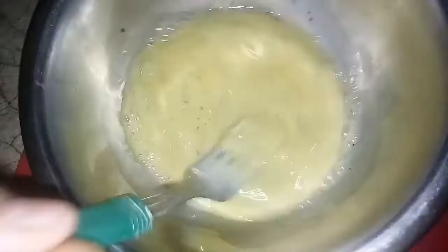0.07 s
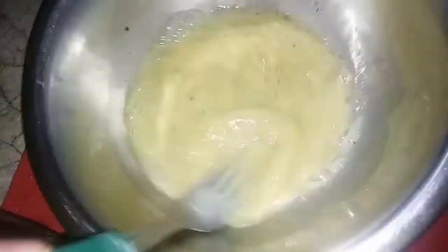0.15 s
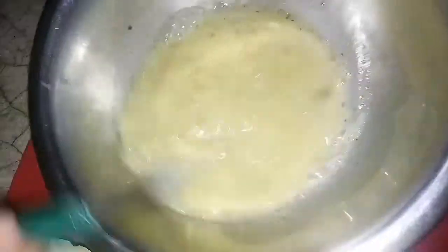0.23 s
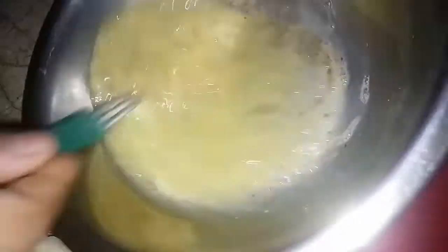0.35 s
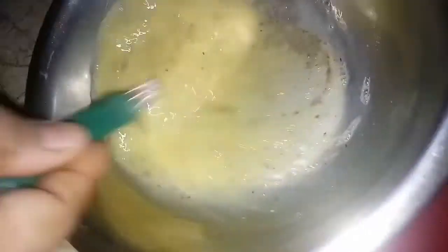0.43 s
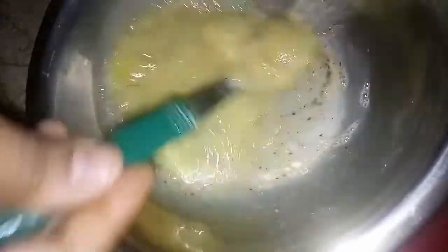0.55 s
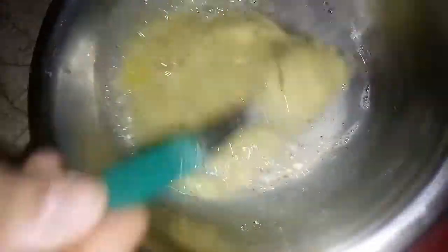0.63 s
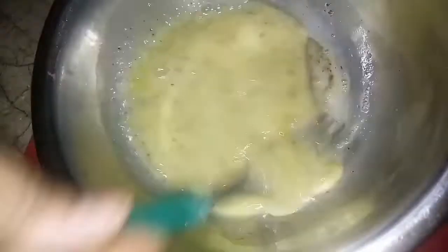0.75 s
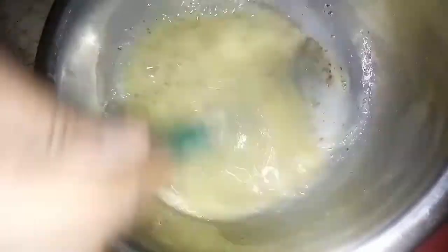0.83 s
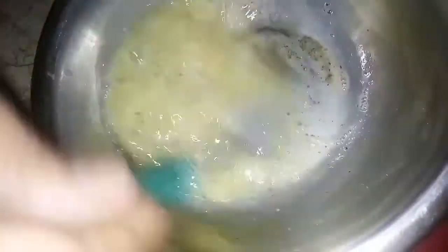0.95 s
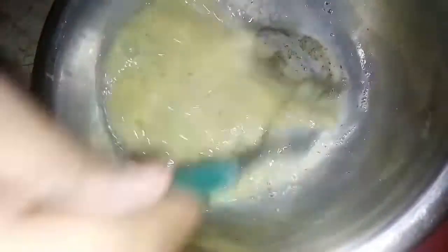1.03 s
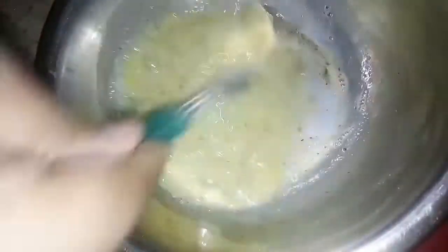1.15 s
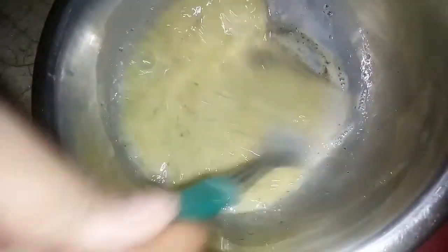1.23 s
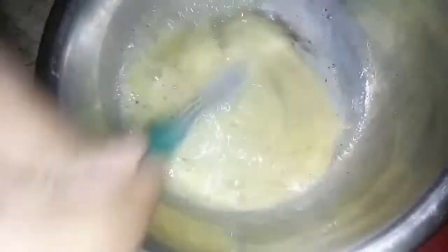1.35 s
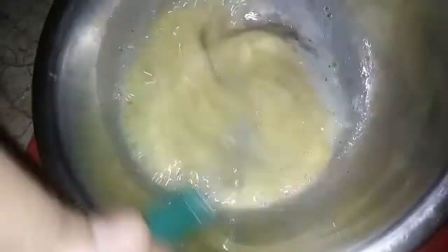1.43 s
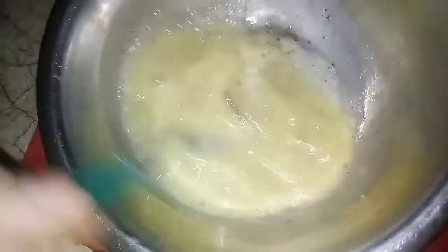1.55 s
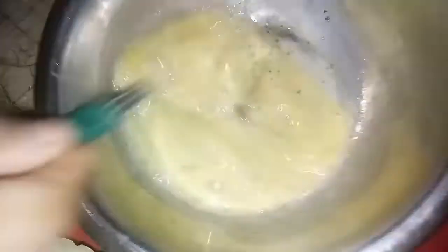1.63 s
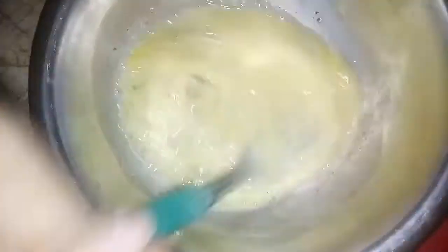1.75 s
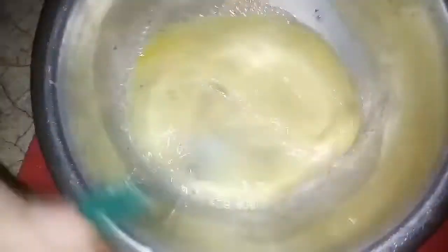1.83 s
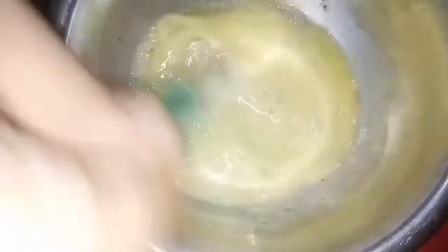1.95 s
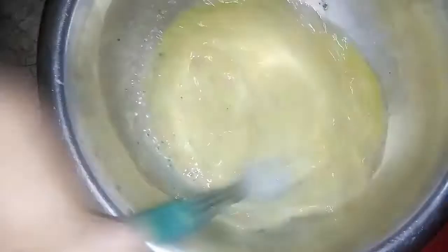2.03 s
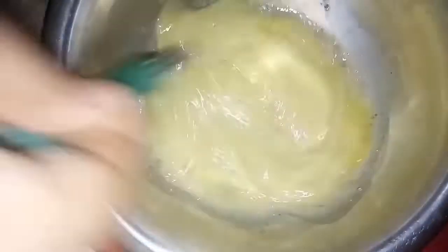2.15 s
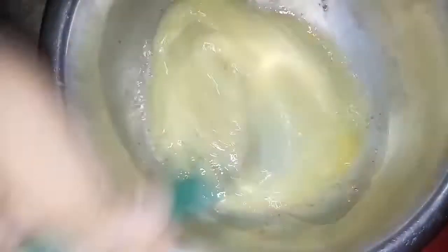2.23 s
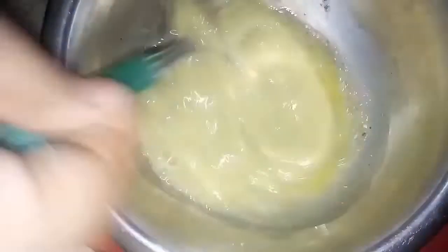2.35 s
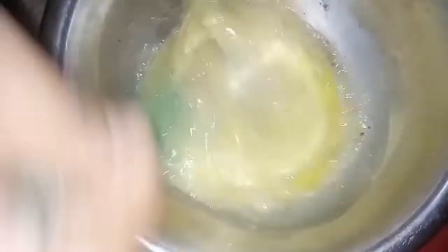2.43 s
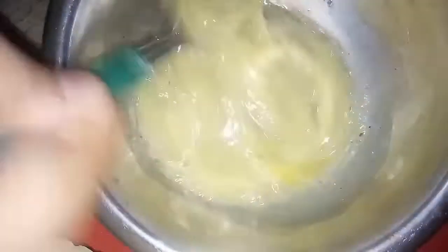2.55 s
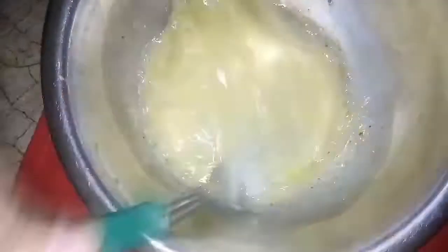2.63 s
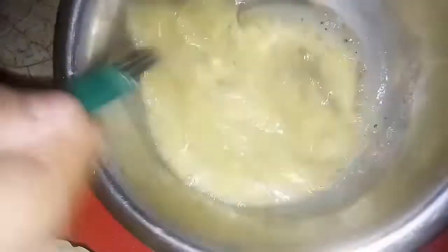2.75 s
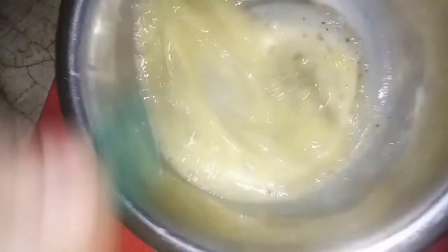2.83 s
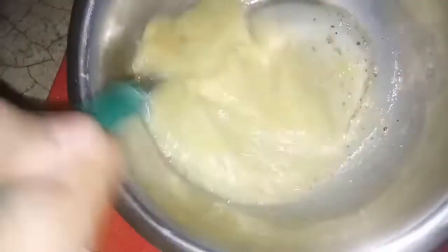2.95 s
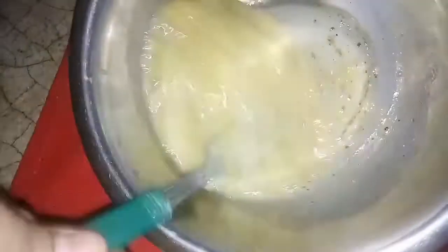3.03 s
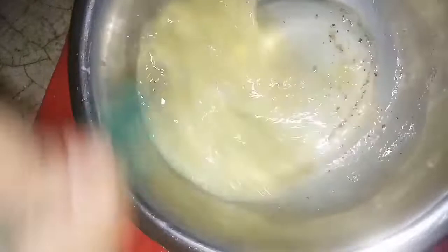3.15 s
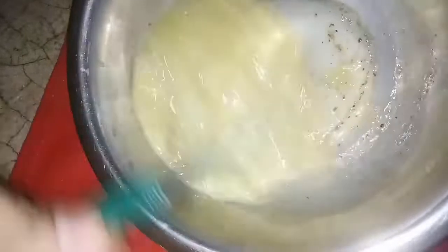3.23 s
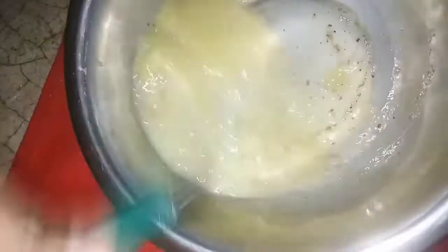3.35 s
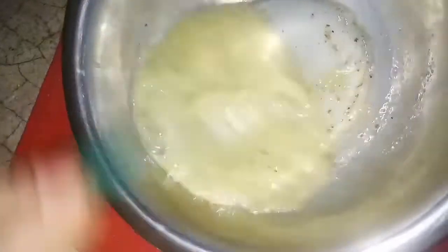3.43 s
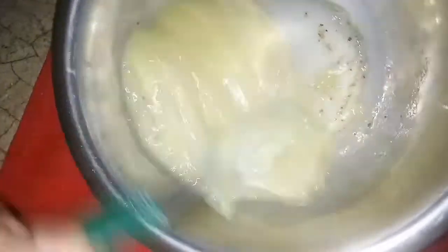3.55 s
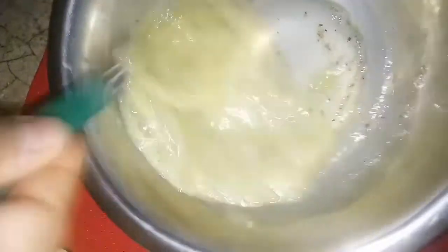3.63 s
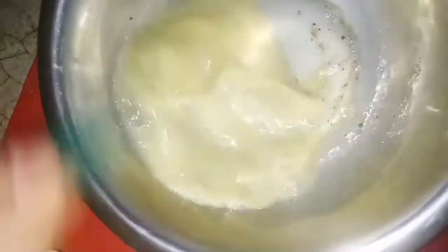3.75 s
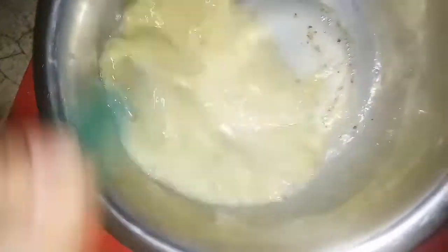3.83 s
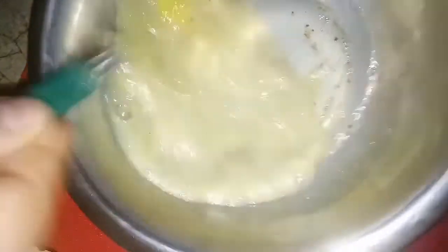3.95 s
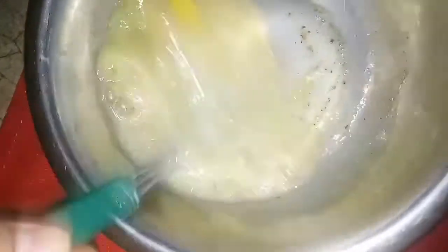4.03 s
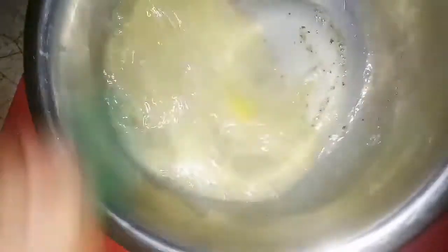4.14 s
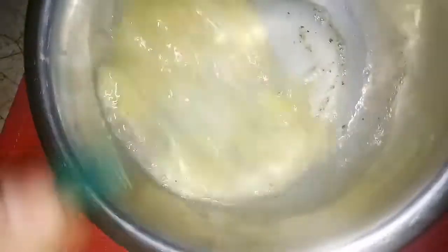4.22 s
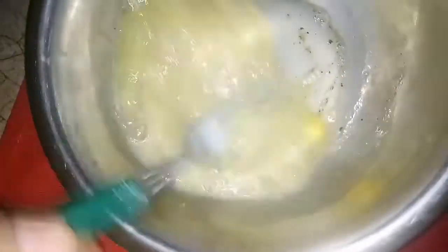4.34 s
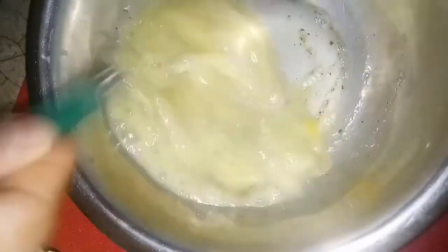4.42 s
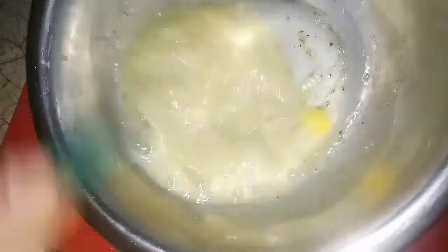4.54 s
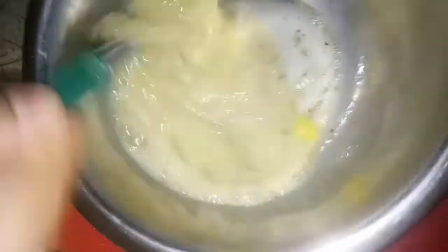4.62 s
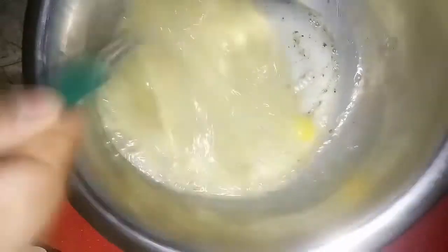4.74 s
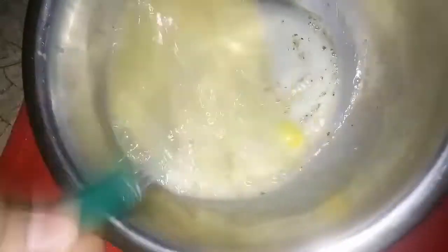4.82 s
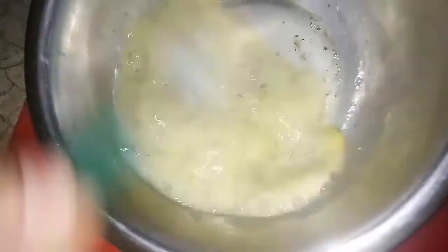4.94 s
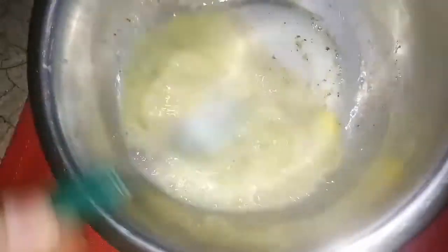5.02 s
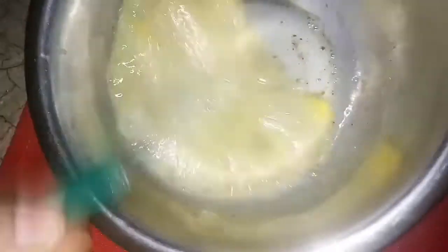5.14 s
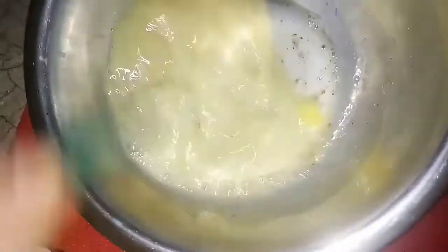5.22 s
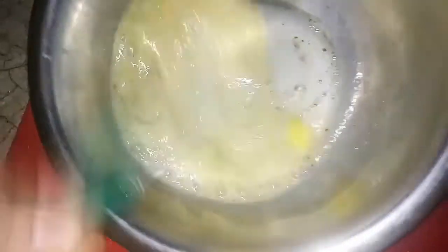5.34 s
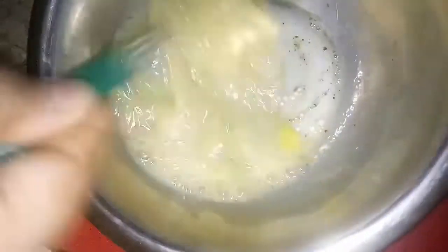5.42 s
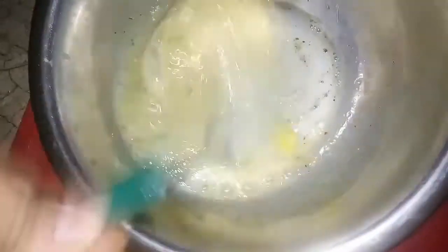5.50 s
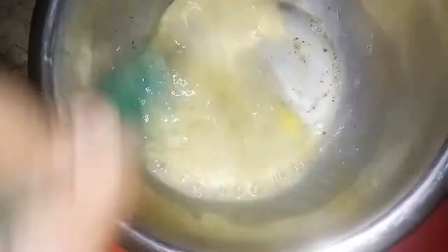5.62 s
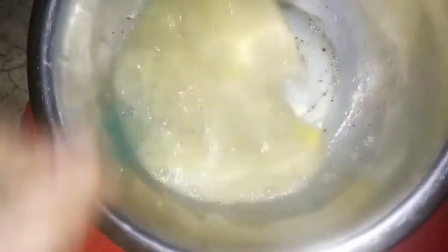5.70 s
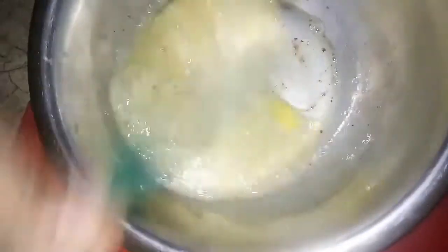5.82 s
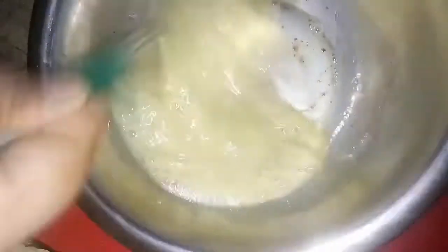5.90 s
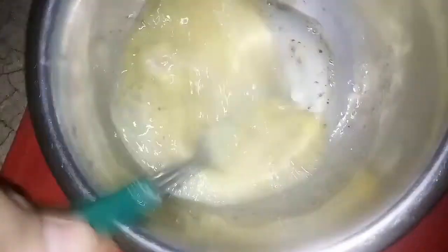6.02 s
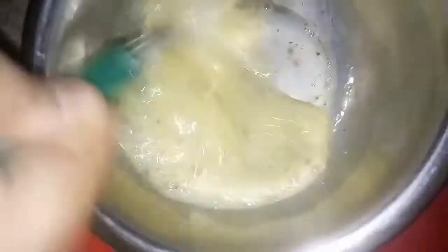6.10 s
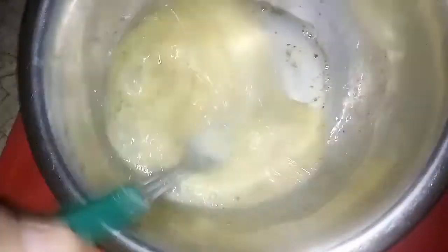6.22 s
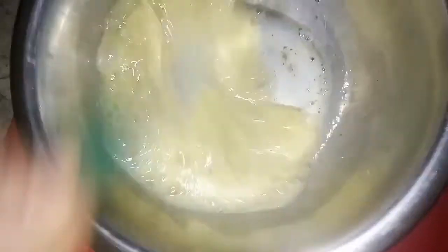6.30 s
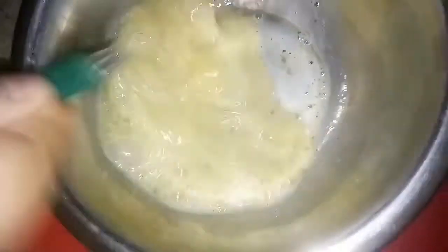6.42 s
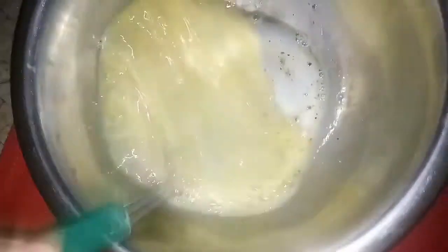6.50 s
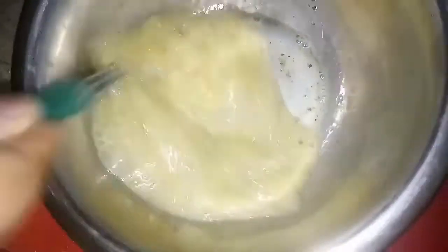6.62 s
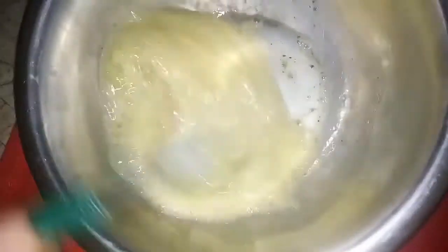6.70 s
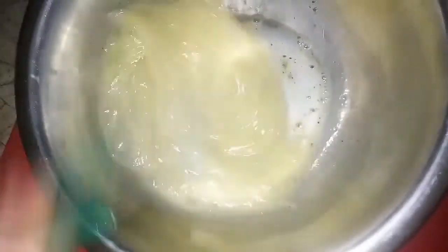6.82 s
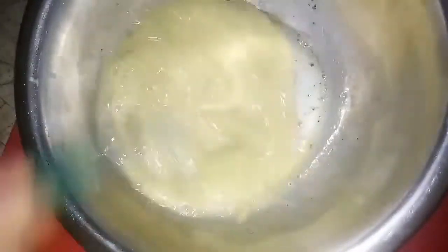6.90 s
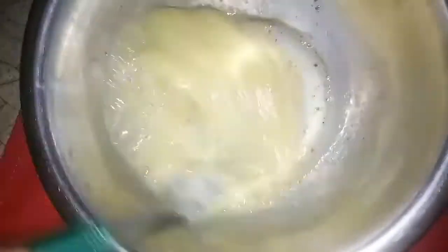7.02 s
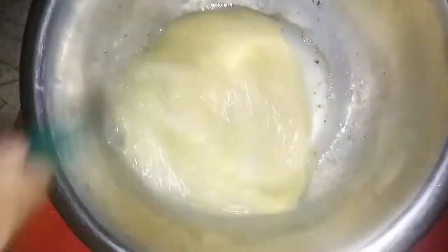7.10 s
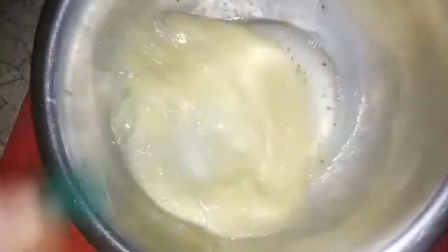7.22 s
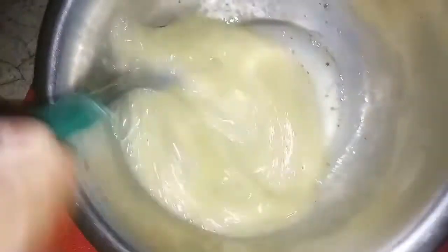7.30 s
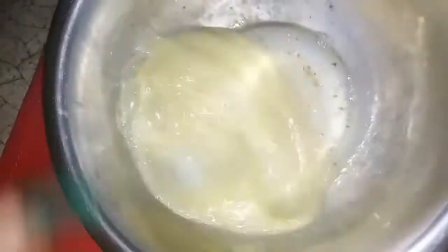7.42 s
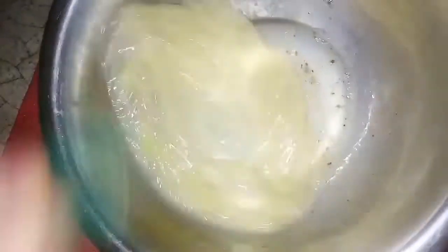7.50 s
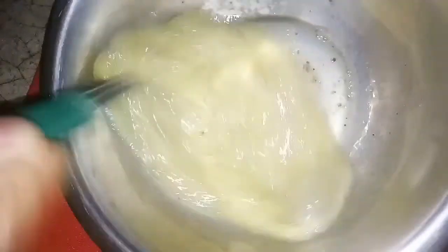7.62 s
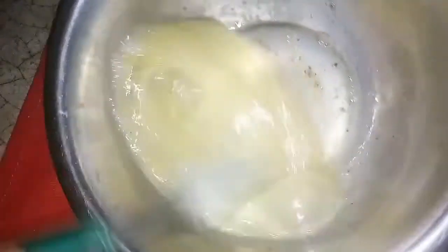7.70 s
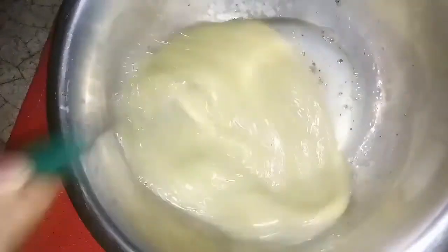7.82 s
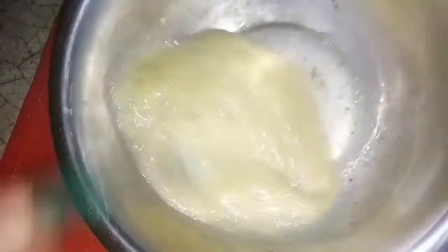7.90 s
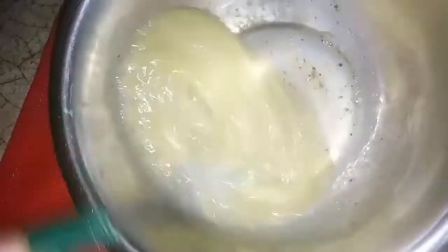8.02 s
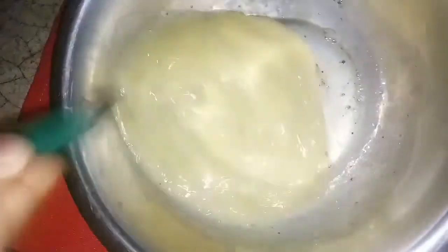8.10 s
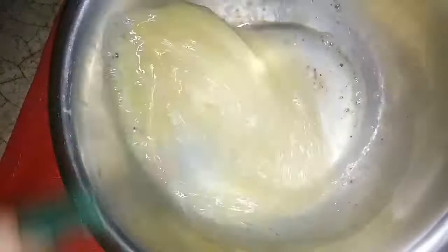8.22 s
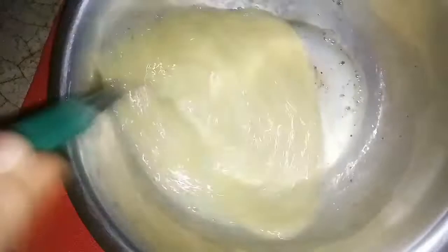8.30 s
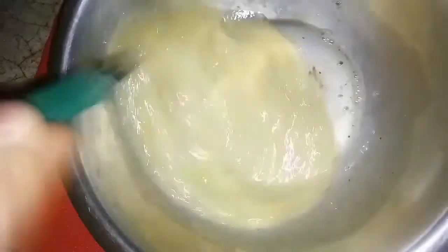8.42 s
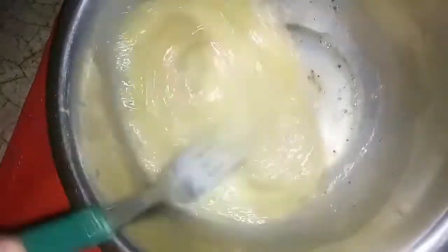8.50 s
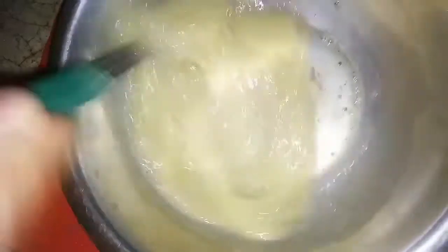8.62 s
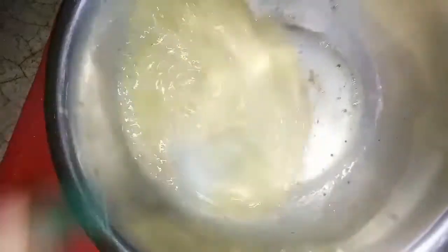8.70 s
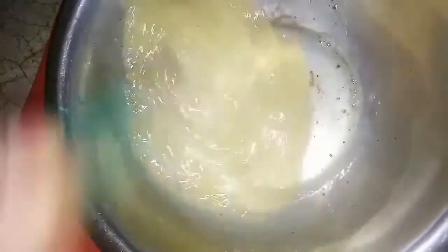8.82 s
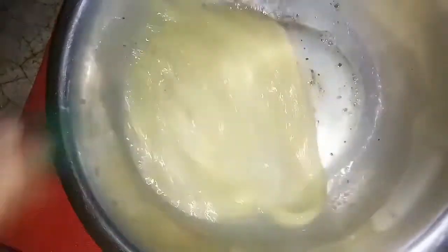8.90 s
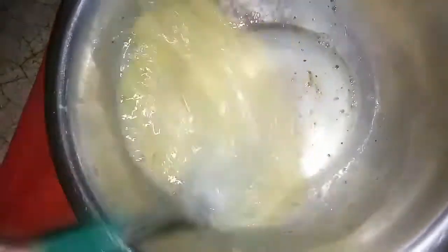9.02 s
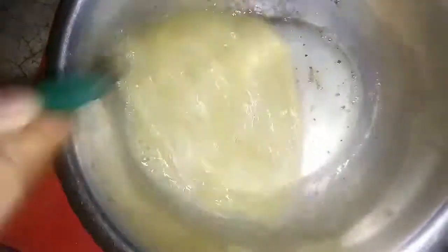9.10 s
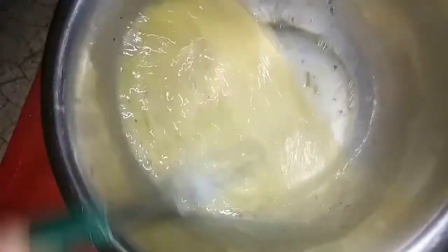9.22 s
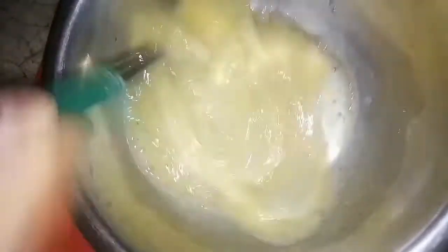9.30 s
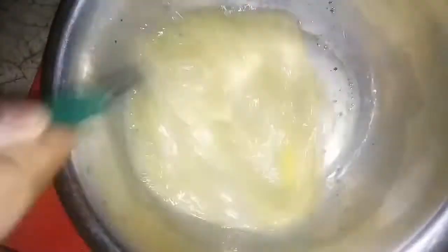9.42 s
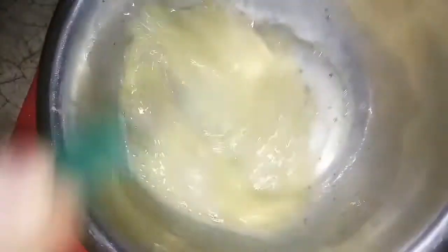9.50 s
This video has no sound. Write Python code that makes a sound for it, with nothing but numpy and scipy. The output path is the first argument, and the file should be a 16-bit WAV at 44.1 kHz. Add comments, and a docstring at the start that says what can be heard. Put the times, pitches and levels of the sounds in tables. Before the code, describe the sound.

A fork briskly beats egg in a steel bowl, sharp metallic clacks and scrapes with wet gurgling, uneven at first, then fast and steady.

```python
"""In a quiet kitchen, close to a phone, a fork beats eggs in a steel bowl, unevenly at first, then briskly.
Each blow excites the damped modes of the wet bottom; the tines then slide by stick-slip until they lift.
Bubbles ring in the egg and bright swishes pass as the tines skim the bowl before turning.
The dry rim sings on in thin, long modes whenever the hand and the egg damp it less."""
import sys
import numpy as np
from scipy import signal
from scipy.fft import rfft, irfft, next_fast_len
from scipy.io import wavfile
from scipy.ndimage import uniform_filter1d

SR = 44100
rng = np.random.default_rng(int(sys.argv[2]) if len(sys.argv) > 2 else 0)


def materialize(psi):
    """Save the field psi as 16-bit PCM at rate SR to the path in sys.argv[1].

    A 1-D psi becomes a single channel; in a 2-D psi each row is a channel.
    """
    bounded = np.clip(np.atleast_2d(psi).T, -1, 1)
    quanta = np.round(bounded * 32767).astype(np.int16)
    wavfile.write(sys.argv[1], SR, quanta)


N = 421287  # samples


def undb(db):
    """Decibels: the amplitude gain of a level."""
    return 10 ** (np.asarray(db, float) / 20)


def level(x, db):
    """Root mean square: scales a sound to an rms level in dB."""
    return x * undb(db) / np.sqrt(np.mean(x ** 2))


def lowpass(x, order, hz):
    """Butterworth filtering: keeps what lies below a frequency."""
    return signal.sosfilt(signal.butter(order, hz, fs=SR, output="sos"), x)


def highpass(x, order, hz):
    """Butterworth filtering: keeps what lies above a frequency."""
    return signal.sosfilt(signal.butter(order, hz, "high", fs=SR, output="sos"), x)


def colour(x, spectrum):
    """Spectral shaping: filters by (Hz, dB) points joined on a logarithmic frequency axis."""
    size = next_fast_len(len(x))
    hz, db = np.transpose(spectrum)
    log_bins = np.log(np.arange(size // 2 + 1) * SR / size + 1)
    gain = undb(np.interp(log_bins, np.log(hz), db))
    return irfft(rfft(x, size) * gain, size)[:len(x)]


def mode(x, hz, t60):
    """Modal resonance: one damped oscillator; a unit click makes it ring with size 1."""
    pole = np.exp(2j * np.pi * hz / SR - np.log(1000) / (t60 * SR))
    return signal.lfilter([1], [1, -pole], x).imag


def walk(rate):
    """Random modulation: slews between random levels 1 / rate s apart, with a spread near 1."""
    hold = int(SR / rate)
    held = np.repeat(rng.standard_normal(N // hold + 1), hold)
    return 1.5 * uniform_filter1d(held, hold)[:N]


EVENNESS = .7  # 0-1, how evenly the hand presses


def steady(x, span_s):
    """Level compression: swells longer than the span are evened out; rms 1."""
    power = uniform_filter1d(x ** 2, int(span_s * SR))
    return level(x / np.maximum(power, 1e-9 * power.max()) ** (EVENNESS / 2), 0)


# room noise: pitch_hz [Hz], level_db [dB per Hz]
KITCHEN_SPECTRUM = [(20, -37), (60, 0.5), (112, 1.5), (129, 7.5), (148, -0.5), (260, 3.5), (370, -6.5),
                    (800, -7), (3100, -10.5), (3500, -18), (7000, -26), (12000, -39), (15600, -43),
                    (16000, -70)]
# fading of the rumble: time_s [s], level_db [dB]
RUMBLE_FADE = [(0, 1.5), (3.4, -2), (4.5, -2), (9.55, -3.5)]
# low thrum while the rim sings loudest: middle_s [s], level_db [peak dB]
THRUMS = [(7.63, -53), (8.1, -53.5)]
THRUM_HZ, THRUM_S = 73, 0.076  # pitch; time from the middle of the swell to 1/e
KITCHEN_DB = -54.5  # rms of hiss and rumble


def kitchen():
    """Broadband room noise: a low rumble that wavers under a faint even hiss, with a low thrum."""
    t = np.arange(N) / SR
    swell = sum(undb(db) * np.exp(-((t - s) / THRUM_S) ** 2) for s, db in THRUMS)
    thrum = swell * np.sin(2 * np.pi * THRUM_HZ * t)
    room = colour(rng.standard_normal(N), KITCHEN_SPECTRUM)
    rumble = signal.sosfiltfilt(signal.butter(2, 300, fs=SR, output="sos"), room)
    rumble_db = np.interp(t, *np.transpose(RUMBLE_FADE)) + 1.5 * walk(19)
    return level(room + (undb(rumble_db) - 1) * rumble, KITCHEN_DB) + thrum


def floor_shake(bowl):
    """Structure-borne sound: the bowl's loudness, averaged mostly over the moment before, shakes the floor."""
    noise = colour(rng.standard_normal(N), [(20, -20.5), (150, -15.5), (400, -18.5), (1000, -27)])
    return level(uniform_filter1d(np.abs(bowl), 250, origin=100) * noise, -54.5)


def bubble(hz, decay_s, glide):
    """Bubble resonance: a pocket of air rings briefly, rising as it closes."""
    t = np.arange(2048) / SR
    cycles = hz * t * (1 + glide * np.tanh(t / decay_s / 3))
    return (1 - np.exp(-hz * t)) * np.exp(-t / decay_s) * np.sin(2 * np.pi * cycles)


# colour of the bowl as the egg froths: time_s [s], slide_treble_db [dB], bass_db [dB]
BOWL_STATE = [(0, 9.5, 4), (1.2, 10.5, -1), (2, 11, -41), (3, 4, 10), (4, -1, 8.5), (5, 3, 6), (6, 4, 5),
              (7, 1.5, 8), (8, 4.5, 9.5), (9.55, 1.5, 6)]
BASS_HZ, TREBLE_HZ = 1300, 4000  # bass lies below, treble above


def froth(s):
    """Changing load: treble of the slide and bass of the bowl (dB) as the egg froths."""
    state_s, *columns = np.transpose(BOWL_STATE)
    return [np.interp(s, state_s, column) for column in columns]


GURGLE_SPREAD_DB = 2.8


def gurgle(touch, count=700, low_hz=503.0, high_hz=3290.0, gurgle_db=0.5, cycles=4.1, glide=0.11):
    """Bubble population: small bubbles of every size burst while the tines drag through the egg."""
    out = np.zeros(N + 2048)
    for place, pitch, size in rng.random((count, 3)):
        i = int(place * N)
        hz = low_hz * (high_hz / low_hz) ** pitch
        db = gurgle_db - GURGLE_SPREAD_DB * np.log(size + 0.068)
        db += (hz < BASS_HZ) * (froth(i / SR)[1] - 15.0)
        out[i:i + 2048] += touch[i] * undb(db) * bubble(hz, cycles / hz, glide)
    return out[:N]


# air pockets plopping in the egg: start_s [s], level_db [dB], pitch_hz [Hz, before the rise]
PLOPS = [(0.386, -30, 1130), (2.597, -25.5, 1260), (3.043, -16, 1045), (3.253, -19.5, 1116),
         (3.316, -25, 765), (3.404, -15.5, 1040), (3.601, -12, 1220), (3.772, -13.5, 1183),
         (3.917, -19.5, 1115), (3.971, -26, 1200), (4.24, -23, 1130), (5.699, -25, 1150),
         (7.244, -26, 1130), (7.939, -14, 1076), (8.217, -34, 1150), (8.415, -16.5, 1210),
         (9.386, -23, 1120), (5.153, -17, 1110), (5.656, -11, 740), (5.98, -22.5, 1016), (6.683, -20, 1074),
         (7.545, -9.5, 1225), (7.877, -13, 1220), (8.029, -24, 1190), (8.526, -15.5, 1340),
         (8.569, -17, 1234), (9.364, -10, 1155), (8.116, -18, 1780)]


def plops(decay_s=0.0055, glide=0.089):
    """Bubble resonance: the larger pockets of air ring one by one."""
    out = np.zeros(N + 2048)
    for s, db, hz in PLOPS:
        i = int(s * SR)
        out[i:i + 2048] += undb(db) * bubble(hz, decay_s, glide)
    return out[:N]


# singing of the rim: start_s [s], end_s [s], level_db [dB], loudest_hz [Hz, halfway]
SINGING = [(1.766, 1.92, -63, 3450), (4.533, 4.678, -47, 3150), (5.266, 5.49, -47, 3250),
           (7.06, 7.209, -40.5, 3450), (7.247, 7.34, -44, 2980), (7.463, 7.526, -46.5, 3560),
           (7.543, 7.623, -40, 3700), (7.593, 7.71, -29, 3440), (7.72, 7.854, -40, 3160),
           (7.863, 8.023, -47, 3860), (8.033, 8.13, -36, 4240), (8.125, 8.187, -36, 3650),
           (8.035, 8.145, -38.5, 6000), (8.108, 8.2, -51, 5340), (8.374, 8.464, -46, 2880),
           (8.673, 8.805, -43.5, 3450), (8.85, 8.986, -47.5, 3100), (9.04, 9.185, -52, 3870),
           (9.446, 9.56, -44, 3570)]
# modes of the dry rim: pitch_hz [Hz], level_db [dB]
RIM_MODES = [(2519, -11), (2762, 7.5), (3047, 2.5), (3354, 6.5), (3660, -7.5), (3967, 6), (4274, 5),
             (4600, -26), (4990, -4), (5346, 1), (5722, -7), (6142, 1), (6570, -7), (7241, -2.5)]
RIM_T60_S, RIM_FLICKER_DB, RIM_MIX_DB = .2, 2.0, 2.0  # flicker in time; scatter from one singing to the next
SPREAD, REACH = 0.14, 0.22  # width of the favoured modes (log frequency); least share of the others
SING_RISE = .1  # the loudest modes climb by this share as the rubbed spot moves


def favoured(hz, loudest_hz):
    """Resonant selection: the share of a mode by its distance from the loudest one."""
    return 1 / (1 + (np.log(hz / loudest_hz) / SPREAD) ** 2)


def rim(touch, rub, always_db=-20.0):
    """Friction-driven modes: rubbing sustains the rim, faintly at every slide and clearly when it is free."""
    t, out = np.arange(N) / SR, 0
    for hz, db in RIM_MODES:
        gain = undb(always_db) * touch * favoured(hz, 3400)
        for start, end, sing_db, loudest_hz in SINGING:
            i = slice(int(start * SR), int(end * SR))
            part = (t[i] - start) / (end - start)
            near = favoured(hz, loudest_hz * (1 + SING_RISE * (part - .5)))
            swell = np.abs(np.sin(np.pi * np.abs(part) ** 0.83)) ** 0.8
            mixed_db = sing_db + RIM_MIX_DB * rng.standard_normal()
            gain[i] += undb(mixed_db) * swell * np.maximum(near, REACH)
        # every mode of the round rim is a close pair
        tone = level(steady(mode(rub, hz, RIM_T60_S), 0.023), -3)
        tone = tone + level(mode(rub, hz * 1.008, RIM_T60_S), -24)
        out = out + gain * undb(db + RIM_FLICKER_DB * walk(45)) * tone
    return out


# steady dragging over one spot: start_s [s], end_s [s], level_db [rms dB before fading], pitch_hz [Hz]
RASPS = [(1.325, 1.383, -47, 2950), (1.535, 1.59, -44, 2700), (1.646, 1.722, -37.5, 2780),
         (1.707, 1.74, -38, 2100)]


def rasps(rub, t60=.022):
    """Single-mode friction: the rubbing heard through one damped mode, as a narrow rasp."""
    out = np.zeros(N)
    for start, end, db, hz in RASPS:
        i = slice(int(start * SR), int(end * SR))
        fade = np.sqrt(np.hanning(i.stop - i.start))
        out[i] += level(mode(rub[i], hz, t60), db) * fade
    return out


# tines skimming the bowl before turning: middle_s [s], half_length_s [s], level_db [dB]
SWISHES = [(0.186, 0.028, -43), (0.966, 0.024, -39.5), (1.041, 0.014, -38), (1.271, 0.012, -34.5),
           (1.373, 0.024, -41), (1.445, 0.055, -37), (1.497, 0.019, -34.5), (1.586, 0.027, -45),
           (1.831, 0.021, -35.5), (2.311, 0.024, -34), (2.46, 0.0086, -36.5), (2.648, 0.027, -36.5),
           (3.229, 0.012, -38), (3.749, 0.012, -37), (4.232, 0.0098, -41), (4.553, 0.022, -52),
           (5.549, 0.011, -38), (5.877, 0.012, -40), (6.222, 0.0099, -45), (6.395, 0.012, -49),
           (6.6, 0.021, -36), (6.74, 0.017, -40.5), (6.953, 0.027, -40), (7.273, 0.016, -43),
           (7.306, 0.0074, -42), (7.429, 0.017, -37), (7.791, 0.0072, -43), (7.961, 0.01, -41),
           (8.256, 0.01, -50), (8.587, 0.01, -38), (9.058, 0.012, -44), (9.235, 0.022, -48),
           (9.294, 0.011, -37), (1.238, 0.024, -30), (2.09, 0.028, -40), (2.362, .008, -46),
           (5.04, 0.015, -39), (5.197, 0.013, -45)]
# colour of the skimming: pitch_hz [Hz], level_db [dB per Hz]
SWISH_SPECTRUM = [(1500, -4), (2500, 4), (4000, 3), (6500, 5), (8300, -10), (10800, -0.5), (13000, -7),
                  (14600, -0.5), (15600, -4), (16000, -40)]


def swishes(rub):
    """Friction noise: short grainy swells of bright rubbing."""
    gain, t = np.zeros(N), np.arange(N) / SR
    for s, half_s, db in SWISHES:
        i = slice(max(int((s - half_s) * SR), 0), int((s + half_s) * SR))
        gain[i] += undb(db) * np.cos(np.pi / 2 * (t[i] - s) / half_s) ** 2
    return gain * steady(colour(rub, SWISH_SPECTRUM), 0.014)


HISS_DB = -2.0  # fine hiss relative to the catches


def rubbing(grains_per_s=1200.):
    """Stick-slip friction: small uneven catches, coming in clusters, in a fine hiss."""
    busy = undb(5.0 * walk(40))  # multiplies the rate of catches
    catches = (rng.random(N) < busy * grains_per_s / SR) * rng.standard_normal(N)
    catches /= np.sqrt(uniform_filter1d(busy, 800))  # sparse stretches have larger catches
    hiss = level(rng.standard_normal(N), HISS_DB)
    return (level(catches, 0) + hiss) * undb(2.0 * walk(110))


# the tines lift this long before the next blow, and slide no longer than this (s)
LIFT_S, LONGEST_SLIDE_S = 0.0024, 0.13
SETTLE_S, SAG = 0.0073, 0.58  # the slide holds this long, then moves quickly at first and slower later


def contact(lift_db_per_s=2500.):
    """Contact envelope: loudness of the sliding tines from each blow until they lift off for the next."""
    db = np.full(N, -90.)
    t = np.arange(N) / SR
    starts = [row[0] for row in STROKES]
    for (s, _, _, start_db, end_db), next_s in zip(STROKES, starts[1:] + [N / SR]):
        length = np.clip(next_s - s - LIFT_S, .015, LONGEST_SLIDE_S)
        i = int(s * SR)
        after = t[i:i + SR // 2] - s
        part = np.clip((after - SETTLE_S) / (length - SETTLE_S), 0, 1)
        lifted_db = lift_db_per_s * np.maximum(after - length, 0)
        db[i:i + SR // 2] = start_db + (end_db - start_db) * part ** SAG - lifted_db
    return uniform_filter1d(undb(db), 40)


def brightness(db_per_octave=2.5):
    """Spectral tilt: a slide after a high glancing tick is brighter than one after a deep blow (dB)."""
    s, _, hz, *_ = np.transpose(STROKES)
    latest = np.maximum(np.searchsorted(s, np.arange(N) / SR) - 1, 0)
    return db_per_octave * np.log2(hz / 3000)[latest]


# colour of the sliding tines: pitch_hz [Hz], level_db [dB per Hz]
SLIDE_SPECTRUM = [(180, -49), (300, -49), (667, -52.5), (1040, -1), (1390, -19.5), (1750, 7), (3290, -1),
                  (3640, -8.5), (4160, -6), (6520, -6), (8090, -11), (9200, -15.5), (10800, -10),
                  (13200, -22.5), (14700, -14.5), (15600, -38), (16000, -55)]
SLIDE_MODES_DB, SLIDE_DAMPING = 1.0, .5  # modes over noise; share of the ring time left while sliding
FLICKER_DB, AIR_HZ = 4.2, 8000  # flicker of each mode; start of the very top


def slide(rub, treble_db, bass_db, patchy_db=2.5, treble_patchy_db=2.5):
    """Forced vibration: the rubbing drives the wet bottom; modes and bands vary as tines and egg move on."""
    body = 0
    for hz, _, t60 in BOTTOM_MODES:
        if 1000 < hz < 8000:
            mode_db = np.interp(hz, *np.transpose(SLIDE_SPECTRUM)) + FLICKER_DB * walk(35)
            ringing = mode(rub, hz, SLIDE_DAMPING * min(t60, LONGEST_T60_S))
            body = body + undb(mode_db) * level(ringing, 0)
    body = highpass(body, 2, 900)
    sound = level(level(colour(rub, SLIDE_SPECTRUM), 0) + level(body, SLIDE_MODES_DB), 0)
    sound = steady(sound, 0.015)
    bass = lowpass(sound, 2, BASS_HZ)
    treble = highpass(sound, 2, TREBLE_HZ)
    air = highpass(treble, 4, AIR_HZ)
    treble = treble + (undb(3.0 * walk(34)) - 1) * air  # the very top flickers on its own
    bass_gain = undb(bass_db + patchy_db * walk(25))
    treble_gain = undb(treble_db + treble_patchy_db * walk(30))
    return sound + (bass_gain - 1) * bass + (treble_gain - 1) * treble


# the bare metal contact: pitch_hz [Hz], level_db [dB per Hz]
CLICK_SPECTRUM = [(500, -20.5), (1500, -8.5), (5000, 8.5), (8500, -5), (11000, -18.5), (15000, -6.5),
                  (17000, -19)]
# deep blows on the flat ring low and dull, glancing ticks of the tips high and thin:
# ring_hz [Hz], treble_db [dB], bass_db [dB, before the froth]
BLOW_COLOUR = [(1200, -16.5, -11), (1870, -9.5, -8), (2540, -21.5, -24.5), (3550, -13.5, 7),
               (4400, -24, -28), (6500, -22, -67)]
# modes of the wet bottom, damped by the egg: pitch_hz [Hz], level_db [dB], t60_s [s, before the tines damp it]
BOTTOM_MODES = [(520, 8.5, 0.12), (1240, 12.5, 0.15), (1793, 18.5, 0.11), (2575, 0, 0.12),
                (2880, -24, 0.0087), (3060, -22, 0.09), (4166, 20.5, 0.035), (5070, 29, 0.026),
                (6560, 21.5, 0.048), (7410, 19, 0.12), (10300, 4, 0.045), (15150, -15, 0.0058)]
# light catches of the tips in mid-slide, starting no new slide: start_s [s], peak_db [dB], ring_hz [Hz]
TICKS = [(1.643, -26, 5860), (2.148, -39, 4600), (2.375, -30, 3200), (2.45, -25, 2510.0),
         (2.753, -29, 4300), (2.768, -38, 5400), (3.498, -18.5, 4060), (3.571, -20, 2280),
         (3.641, -30, 2490.0), (3.805, -34, 1910.0), (3.969, -24, 1720), (4.06, -16, 2120),
         (4.21, -27, 2110.0), (4.478, -13.5, 3000), (4.615, -27, 2250), (4.642, -37, 5510.0),
         (4.772, -20, 3270), (4.796, -26, 1980), (5.046, -30, 7160), (5.183, -22, 4120), (5.516, -30, 2070),
         (6.194, -28, 2950.0), (6.847, -16, 3970), (7.312, -21, 4100), (7.362, -20, 5500),
         (9.008, -35, 4000), (9.181, -18, 4580), (7.789, -18.5, 4900), (7.96, -19, 6500),
         (3.087, -34, 2700), (3.684, -30, 6000), (8.247, -30, 2380.0), (8.278, -21, 2150),
         (8.432, -14.5, 1790), (8.583, -32, 1680), (8.776, -17, 4170), (8.946, -20, 6540.0),
         (9.292, -30, 1960.0)]
# tines meeting the bowl: start_s [s], peak_db [dB, of the whole blow with all its tines], ring_hz [Hz, loudest
# short ring], # slide_start_db [dB, after the blow], slide_end_db [dB, before lifting]
STROKES = [(0.006, -8, 6750, -45, -41), (0.068, -15, 6500, -54, -57), (0.12, -20.5, 2160, -36, -62),
           (0.308, -12.5, 5830, -51, -40), (0.386, -10.5, 1190, -26, -40.5), (0.449, -20, 6600, -44, -49),
           (0.498, -27, 1650.0, -43.5, -42.5), (0.905, -12.5, 4630, -45, -45),
           (0.999, -20.5, 4170, -37, -55), (1.053, -43, 1550, -59, -56), (1.166, -31, 5350, -50, -45.5),
           (1.225, -23, 6200, -43, -48.5), (1.316, -17.5, 1750, -36, -48), (1.403, -20, 1820, -40, -34.5),
           (1.47, -27, 2400, -45, -55), (1.524, -40, 2110.0, -40.5, -50), (1.66, -32, 2780, -44, -45.5),
           (1.745, -4.5, 3480, -33, -54), (1.905, -16, 6270, -45, -56), (1.938, -6.5, 2670, -41, -41),
           (2.044, -11.5, 4510, -31.5, -43), (2.08, -15, 6560, -56, -62), (2.165, -13, 6340, -36, -48),
           (2.191, -6.5, 1780, -23.5, -45), (2.28, -7, 6500, -47, -53.5), (2.391, -18, 1920, -35, -40),
           (2.41, -6.5, 2660, -35, -44), (2.486, -11.5, 1870, -37.5, -50.5), (2.57, -13.5, 4180, -46, -51),
           (2.596, -6, 1850, -23, -48.5), (2.677, -10.5, 6800, -30.5, -51.5), (2.785, -6, 2530, -23.5, -41),
           (2.841, -17, 2100, -31, -39), (2.873, -6.5, 6400, -34.5, -52.5), (2.975, -18, 3550, -32.5, -22),
           (2.983, -4.5, 2540, -23, -19), (2.991, -9, 2490, -33, -36.5), (3.037, -18, 1080, -26, -37),
           (3.067, -8, 1630, -23, -46.5), (3.157, -19, 6500, -52, -56), (3.173, -7, 2820, -29.5, -40.5),
           (3.25, -9.5, 1850, -31, -45), (3.333, -15.5, 3980, -35, -45), (3.36, -7, 2650, -29, -33),
           (3.41, -14.5, 2370, -25, -40), (3.432, -9.5, 6500, -42, -48), (3.521, -6.5, 2430, -33, -38.5),
           (3.602, -5, 1800, -37.5, -38), (3.676, -12, 4250, -30, -19), (3.69, -8, 1810, -32, -36.5),
           (3.769, -8, 1150, -28, -44), (3.828, -26, 1200, -34, -39), (3.85, -8, 1920, -29.5, -39.5),
           (3.897, -30, 1730.0, -23.5, -33), (3.929, -7.5, 6700, -44.5, -40.5),
           (4.015, -2.5, 2760, -33, -34), (4.091, -9.5, 1840, -40, -40), (4.167, -12.5, 4220, -42, -15),
           (4.183, -3, 2650, -39, -35.5), (4.252, -7, 6260, -44, -37), (4.318, -13, 4240, -72, -43),
           (4.337, -7, 2580, -36, -32.5), (4.415, -6.5, 6760, -38, -48), (4.499, -5, 3300, -24.5, -39.5),
           (4.576, -9, 5080, -37, -43), (4.656, -4, 3140, -34, -34.5), (4.732, -10.5, 1870, -40.5, -39),
           (4.809, -11, 3750, -20.5, -29), (4.827, -4, 3250, -37, -39), (4.901, -5.5, 6870, -42, -47),
           (4.949, -37, 1740.0, -24.5, -38), (4.964, -15, 1900, -29, -32), (4.989, -6, 3420, -29, -41),
           (5.056, -8, 6570, -38.5, -50), (5.15, -4, 3300, -32, -38.5), (5.22, -4, 6530, -24.5, -46),
           (5.313, -5, 3430, -29, -38), (5.402, -3.5, 6500, -36, -48.5), (5.48, -8.5, 2100, -35, -20.6),
           (5.49, -6, 2760, -32, -39.5), (5.57, -7.5, 6480, -37, -48), (5.65, -21, 1720, -16, -41),
           (5.666, -11.5, 1670, -26.5, -40), (5.699, -24, 4100.0, -36, -37), (5.728, -10, 1920, -44, -28),
           (5.748, -10, 6500, -34, -50), (5.811, -16.5, 2770, -25, -47.8), (5.82, -8, 2420, -29, -41.5),
           (5.9, -8.5, 6400, -31, -48.5), (5.981, -13, 2110, -53, -45), (5.997, -4.5, 2670, -36.5, -36.5),
           (6.071, -9.5, 6970, -34, -47), (6.15, -11, 2450, -29, -34), (6.166, -3, 2750, -34, -39),
           (6.243, -5, 6760, -34, -49), (6.322, -18.5, 4500, -46, -43), (6.338, -5.5, 3070, -28, -35.5),
           (6.408, -8.5, 4670, -43, -43.5), (6.477, -20, 4220, -28, -38), (6.51, -8, 2730, -30, -41.5),
           (6.573, -9.5, 1640, -30, -46), (6.657, -19, 2970, -34, -27), (6.662, -7.5, 4260, -46, -36),
           (6.682, 0.5, 2880, -39, -34.5), (6.758, -9, 4400, -32.5, -46.5), (6.862, -5.5, 2580, -25.5, -40),
           (6.928, -7, 6350, -42, -40.5), (7.017, -9, 3700, -50, -39), (7.026, -1.5, 2610, -37, -34.5),
           (7.104, -8, 3890, -33, -49), (7.202, -1.5, 5560, -16.5, -45.5), (7.293, -9.5, 1740, -39, -45),
           (7.372, -6, 2370, -34.5, -40), (7.451, -6.5, 6430, -32, -65), (7.542, -6.5, 1700, -17.5, -31),
           (7.58, -16.5, 1650, -21.5, -27), (7.607, -7.5, 1570, -18, -54), (7.713, -10, 2350, -18, -32),
           (7.737, -15, 2530, -23, -34.5), (7.77, -14, 1680, -18, -53.5), (7.879, -8, 1280, -18, -31.5),
           (7.939, -8, 1260, -25, -46.5), (8.032, -6, 1680, -21.5, -30), (8.115, -8.5, 6500, -34, -55),
           (8.2, -5.5, 1870.0, -24.5, -36.5), (8.267, -8, 1680, -22.5, -55.5), (8.362, -4, 2770, -23, -38),
           (8.415, -11.5, 1630, -28.5, -48.5), (8.524, 1.3, 2730, -34.7, -35),
           (8.569, -8.5, 1250, -43, -34), (8.602, -14, 6340, -28.5, -54), (8.678, -3.5, 1970, -25, -40),
           (8.751, -7.5, 6370, -36, -49.5), (8.843, 2, 2610, -35, -40), (8.921, -7, 6400, -30, -52.5),
           (9.019, -2.5, 2750, -26.5, -40), (9.086, -5.5, 1720, -33, -36.5),
           (9.186, -3.5, 1960, -33.5, -37.5), (9.257, -6, 1850, -25.5, -48), (9.362, -3, 2220, -31, -33.5),
           (9.432, -8, 6360, -36, -40.5), (9.527, -4, 3060, -19, -31.5)]
SCATTER_DB, LONGEST_T60_S = 3.0, .04  # scatter of each mode; ring limit under the resting tines, up to 5 kHz
OWN_T60_S = 0.027  # of a loudest ring at 2 kHz
SNAP_S, SNAP = 0.0029, 0.47  # decay time of the extra loudness at the start, and its size
SOFT_CRACK = 0.083  # soft blows are more crack than ring: dB of crack per dB less
CLICK_DB, TINE_DB = 2.0, -9.0  # click relative to ring and crack; later tines relative to the first
TINE_HZ, TINE_T60_S, TINE_RING_DB = 7500, .2, -36  # the tines' own thin ring after a deep blow


def decaying(t, hz, t60):
    """Free decay: a sine losing 60 dB in t60."""
    return np.sin(2 * np.pi * hz * t) * 1000. ** (-t / t60)


def blows(own_db=28.5, tines_s=.0015, crack_db=6.5, crack_s=0.0037):
    """Impact excitation: each blow rings its own mix of bottom modes; the tines land a moment apart."""
    out = np.zeros(N + 8192)
    t = np.arange(2560) / SR
    hz, db, t60 = np.transpose(BOTTOM_MODES)
    t60 = np.minimum(t60, LONGEST_T60_S * np.minimum(1, 5000 / hz))  # the tines rest on the metal and damp it
    click = colour(np.arange(512) == 16, CLICK_SPECTRUM)
    click /= np.abs(click).max()
    rings, *colours = np.transpose(BLOW_COLOUR)
    for s, peak_db, own_hz, *_ in list(STROKES) + list(TICKS):
        treble_db, bass_db = (np.interp(own_hz, rings, c) for c in colours)
        bass_db += froth(s)[1]
        chance = rng.standard_normal((3, len(hz)))
        mix_db = db + SCATTER_DB * chance[0]
        mix_db += treble_db * (hz > TREBLE_HZ) + bass_db * (hz < BASS_HZ)
        pitch = hz * (1 + 0.023 * chance[1])  # the egg shifts the modes as it sloshes
        ring = undb(mix_db) @ decaying(t, pitch[:, None], t60[:, None])

        own_t60 = OWN_T60_S / np.sqrt(own_hz / 2000)  # higher rings die sooner
        neighbour_hz = own_hz * (1 + 0.13 * chance[1, 0])  # roughens the ring
        pair = decaying(t, own_hz, own_t60) + 0.29 * decaying(t, neighbour_hz, own_t60)
        ring += undb(own_db) * pair

        crack = colour(rng.standard_normal(len(t)), SLIDE_SPECTRUM) * np.exp(-t / crack_s)
        crack /= np.abs(crack).max()
        blow_crack_db = crack_db - SOFT_CRACK * (peak_db + 5) + .5 * treble_db
        ring += undb(blow_crack_db) * np.abs(ring).max() * crack
        ring[:512] += undb(CLICK_DB) * np.abs(ring).max() * click
        ring *= 1 + SNAP * np.exp(-t / SNAP_S)  # loudest before the tines settle on the metal

        if own_hz < TREBLE_HZ:
            tine_gain = undb(TINE_RING_DB + SCATTER_DB * chance[0, 0]) * np.abs(ring).max()
            tine_hz = TINE_HZ * (1 + 0.0092 * chance[1, 1])
            ring += tine_gain * decaying(t, tine_hz, TINE_T60_S) * (1 - t / t[-1])

        tines = np.zeros(512)
        later = np.minimum(np.abs(chance[2, :3]) * tines_s * SR + 8, 511).astype(int)
        tines[later] = undb(TINE_DB) * np.sign(chance[2, 3:6])
        tines[0] = 1
        peak = undb(peak_db)
        ring = np.convolve(ring, tines)
        i = int(s * SR)
        out[i:i + len(ring)] += peak * ring / np.abs(ring).max()
    return out[:N]


def scene():
    """Radiation: the thin bowl radiates little bass but shakes the floor it stands on, over the room."""
    treble_db, bass_db = froth(np.arange(N) / SR)
    touch, rub = contact(), rubbing()
    bowl = gurgle(touch) + plops() + rim(touch, rub) + rasps(rub) + swishes(rub)
    bowl = bowl + touch * slide(rub, treble_db + brightness(), bass_db) + blows()
    bowl = highpass(highpass(bowl, 2, 400), 1, 450)
    return (kitchen() + floor_shake(bowl) + bowl)[None]


LOPSIDED = 0.047  # the microphone swings a little further one way than the other
TOP_HZ = 16600  # upper limit of the phone


def record(dry):
    """Nonlinear transduction: the phone bends loud peaks to one side, rounds them and cuts the top."""
    bent = dry + LOPSIDED * highpass(dry ** 2, 1, 25)
    rounded = 1.8 * np.tanh(bent / 1.8)
    return signal.sosfilt(signal.ellip(12, .2, 95, TOP_HZ, fs=SR, output="sos"), rounded)


dry = scene()
out = record(dry)
materialize(out)
```